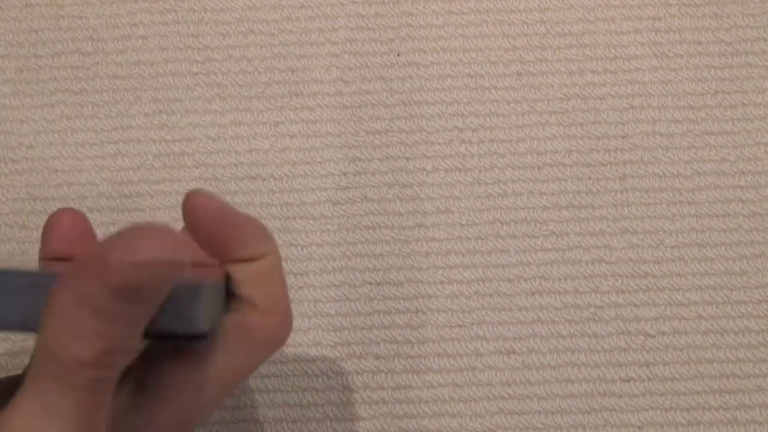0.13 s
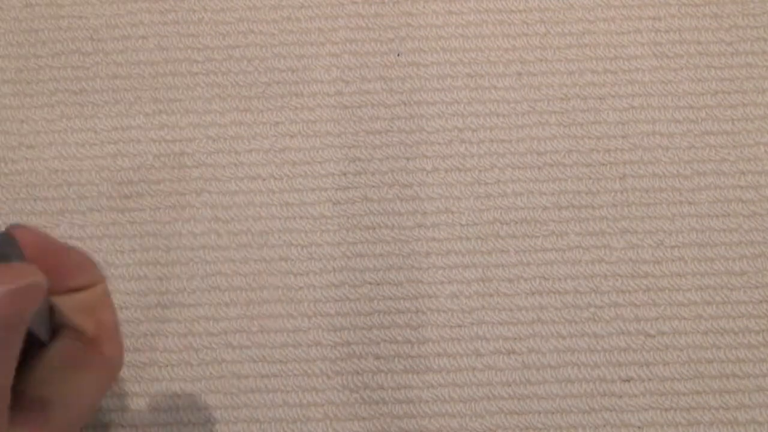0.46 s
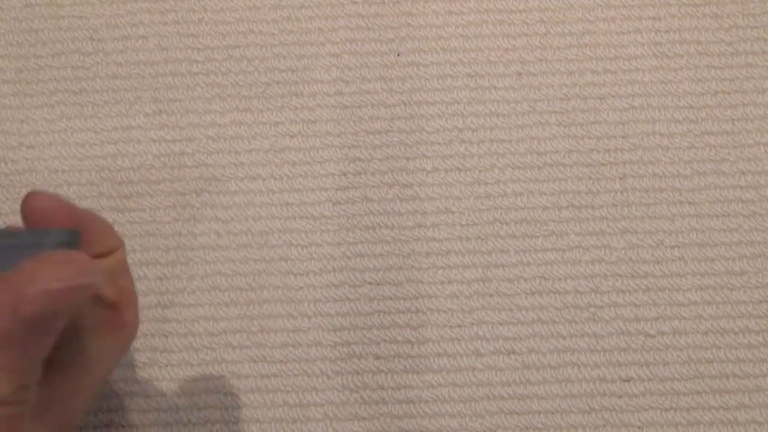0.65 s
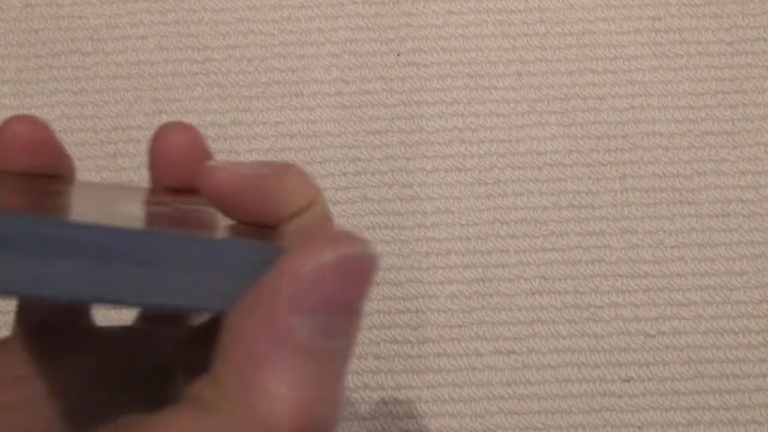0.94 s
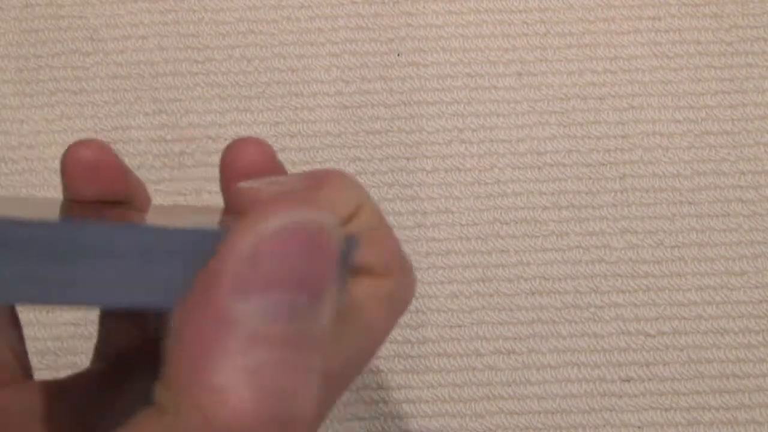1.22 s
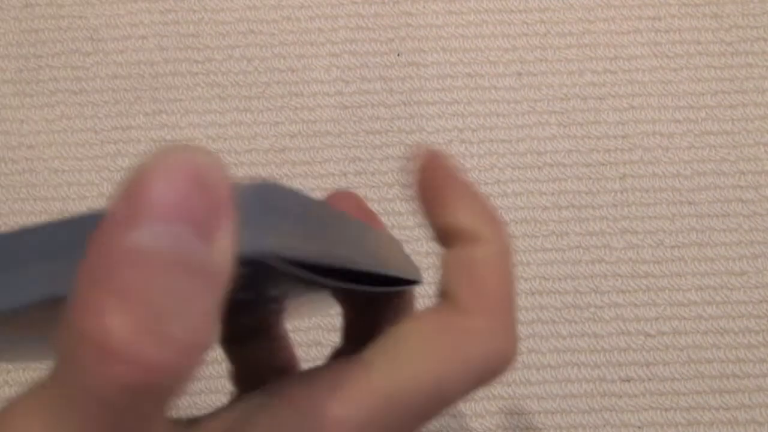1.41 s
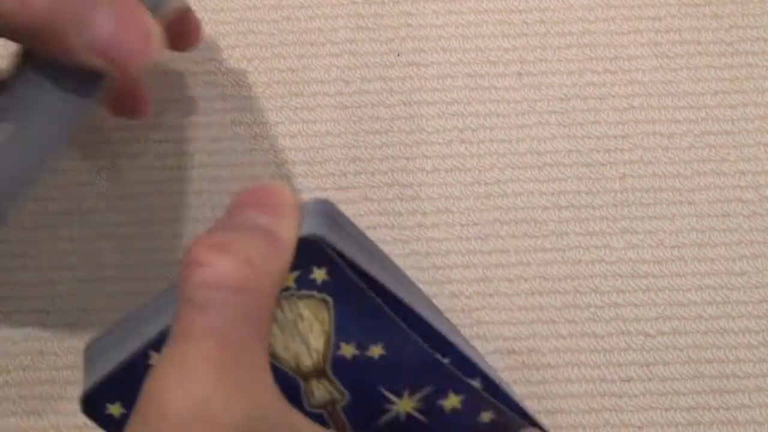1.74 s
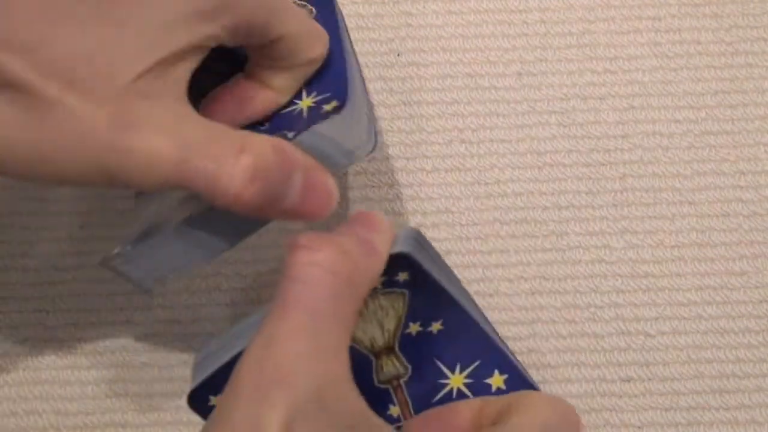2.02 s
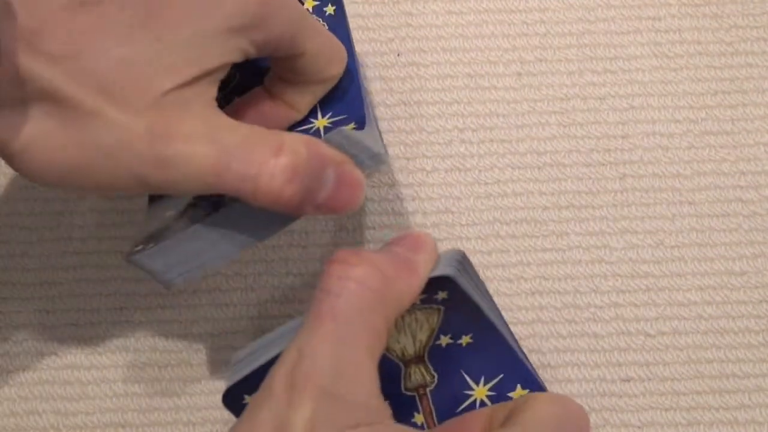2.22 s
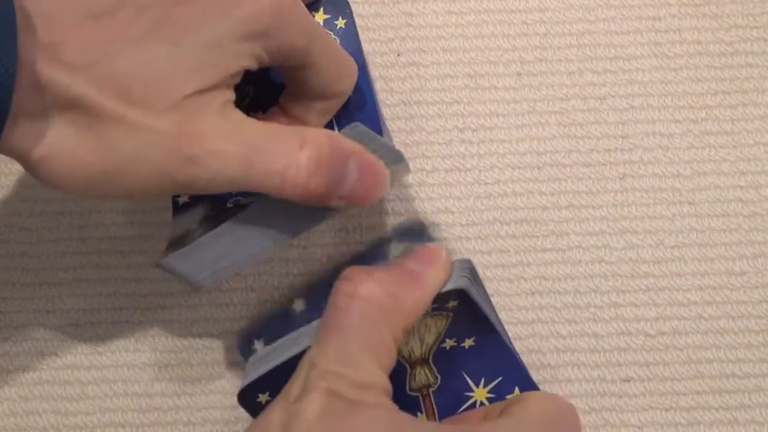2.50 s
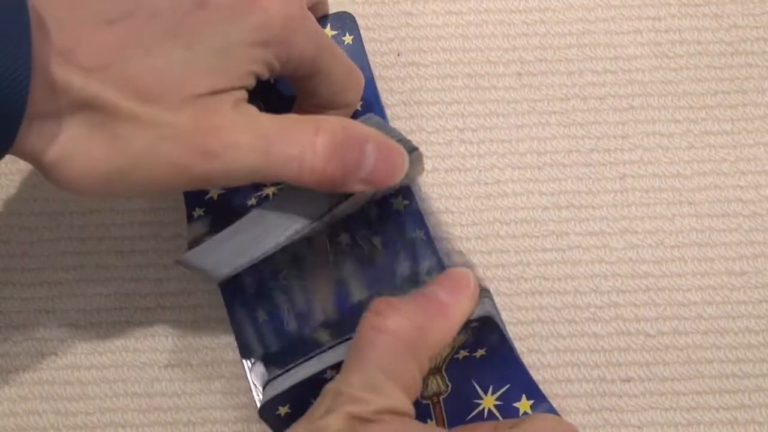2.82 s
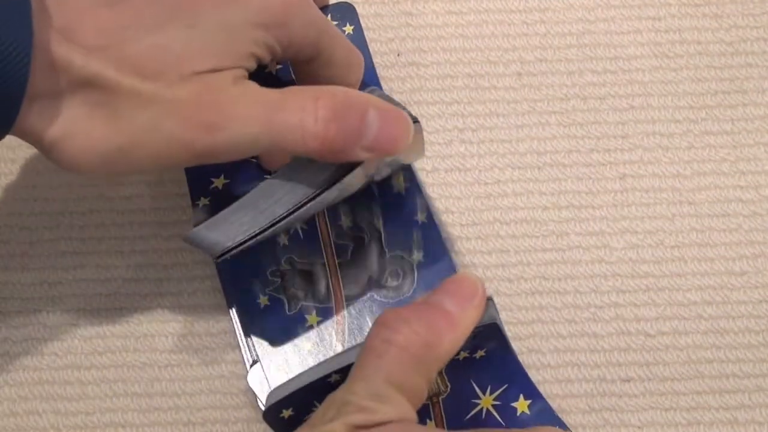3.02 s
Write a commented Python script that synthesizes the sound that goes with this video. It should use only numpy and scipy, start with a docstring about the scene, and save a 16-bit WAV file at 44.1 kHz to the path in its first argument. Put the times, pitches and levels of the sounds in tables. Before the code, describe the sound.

Playing cards are handled and shuffled close by in a quiet small room. For the first two seconds they rub softly, with light knocks near 0.9 and 1.9 seconds. From about 2.5 seconds to just past 3, a much louder riffle follows, with card edges snapping and patting onto the pile. A faint hiss lies underneath, with tiny motor ticks from about 1.5 to 2.5 seconds.

```python
"""A quiet carpeted room: a deck of playing cards is squared and cut, then riffled close to the microphone.
Cards rub over each other and packets knock in the hands. In the riffle, bent cards snap off the thumbs
with a crack and a short ring, then pat down on the pile, and the small room answers briefly.
Underneath lie the room's hush and the hiss and faint ticking of a camera's lens motor.
In the first 0.75 s a faint breath-like rush blends with the hush and the rubbing."""
import sys
import numpy as np
from scipy import signal
from scipy.fft import rfft, irfft, next_fast_len
from scipy.io import wavfile

SR = 44100
rng = np.random.default_rng(int(sys.argv[2]) if len(sys.argv) > 2 else 0)


def wav_record(signal):
    """Record a signal, one row per channel, as 16-bit PCM in the file named by sys.argv[1]."""
    frames = np.transpose(np.atleast_2d(signal))
    bounded = np.clip(frames, -1, 1)
    # unit amplitude maps onto the largest positive 16-bit level
    quanta = np.round(bounded * 32767).astype(np.int16)
    wavfile.write(sys.argv[1], SR, quanta)


N = 138915
TIME = np.arange(N) / SR
AGE = TIME[:2048]  # seconds since a blow began

# The soft thud of a card's face. Each row: frequency in Hz, relative level in dB.
THUD_SPECTRUM = [(30, -45), (70, -25.5), (130, -14), (210, -12), (320, -2), (520, -7.5), (900, -2.5),
                 (1250, -14.5), (2100, -12.5), (4000, -21), (12000, -25.5)]


def from_db(db):
    return 10 ** (np.asarray(db) / 20)


def unit(x):
    """Scale to energy 1."""
    return x / np.sqrt(np.sum(x ** 2) + 1e-20)


def colour(x, spectrum):
    """Minimum-phase filter that follows rows of frequency in Hz and gain in dB."""
    size = 2 * next_fast_len(len(x))
    hz, db = np.transpose(spectrum)
    bin_hz = np.fft.rfftfreq(size, 1 / SR)
    gain = from_db(np.interp(np.log(bin_hz + 1), np.log(hz), db))
    cepstrum = irfft(np.log(gain))
    cepstrum[1:size // 2] *= 2
    cepstrum[size // 2 + 1:] = 0
    return irfft(rfft(x, size) * np.exp(rfft(cepstrum)))[:len(x)]


def steady(noise, spectrum):
    """Colour a scene-long noise and bring it to rms 1."""
    return unit(colour(noise, spectrum)) * np.sqrt(N)


def burst(envelope, spectrum):
    """A dying run of tiny contacts, coloured by the card."""
    return colour(rng.choice([-1, 1], len(AGE)) * envelope, spectrum)


def add_blow(out, start, db, blow):
    """Mix in one blow; its level is that of its energy spread over 4 ms."""
    i = int(np.clip(start * SR, 0, N - 1))
    out[i:i + len(blow)] += (from_db(db) * np.sqrt(.004 * SR) * unit(blow))[:N - i]


def hush_and_motor_hiss():
    """Room hush, lifted at first by a faint breath-like rush; the lens motor's hiss follows its level."""
    # Spectra of the hush and the motor. Each row: frequency in Hz, relative level in dB.
    hush_spectrum = [(20, -2), (32, 7), (45, -3), (130, 2), (300, -2), (700, -9.5), (1500, -8.5),
                     (3500, -9.5), (7000, -16), (10000, -20.5), (15500, -16)]
    motor_spectrum = [(1000, -20), (3500, -49.5), (4400, 3), (4800, 7.5), (5300, 11.5), (5550, 7.5),
                      (5950, -20), (8500, -26), (9900, -37), (11000, -35), (15000, -57)]
    # The hush, with the breath-like rush up to 0.7 s. Each row: time in seconds, level in dB.
    hush_and_rush_levels = [(0, -52.5), (.7, -53), (1.05, -56.5), (1.8, -56), (2.1, -55.5), (2.45, -60),
                            (3.15, -55)]
    level = from_db(np.interp(TIME, *np.transpose(hush_and_rush_levels)))
    hush = steady(rng.standard_normal(N), hush_spectrum)
    hiss = steady(rng.standard_normal(N), motor_spectrum)
    return level * (hush + from_db(-4) * hiss)


def lens_ticks():
    """The lens motor ticks faintly and regularly for about a second."""
    # The resonances of a tick. Each row: pitch in Hz, mean level in dB, decay in seconds.
    modes = [(3060, -56, 0.0036), (3740, -68, 0.00093)]
    ticks_per_s = 25
    out = np.zeros(N)
    for start in np.arange(1.541, 2.52, 1 / ticks_per_s):
        for hz, db, decay in modes:
            ring = np.exp(-AGE / decay) * np.sin(2 * np.pi * hz * AGE)
            add_blow(out, start, db + rng.standard_normal(), ring)
    return out


def room_tail(x):
    """A small room's diffuse tail; the bass lasts a little longer."""
    bass_t60_s, treble_t60_s, delay_s, build_s = .27, .22, .0063, .0095
    age = np.maximum(TIME[:SR // 2] - delay_s, 0)
    noise = rng.standard_normal(len(age))
    bass = signal.sosfilt(signal.butter(1, 500, fs=SR, output="sos"), noise)
    tail = bass * 1000. ** (-age / bass_t60_s) + (noise - bass) * 1000. ** (-age / treble_t60_s)
    build_up = 1 - np.exp(-age / build_s)
    return signal.fftconvolve(x, unit(tail * build_up))[:N]


def rubbing_and_rush():
    """Soft card rubbing, grainy and swishing, blended with a faint breath-like rush in the first 0.75 s."""
    # Swells of rubbing; the long ones at 0.308 and 0.476 s carry the rush. Each row: middle in seconds,
    # half length in seconds, broad noise level in dB, swish level in dB, swish pitch in Hz.
    swells = [(0.052, 0.031, -50.5, -57, 3840), (0.124, 0.015, -55, -61, 3500),
              (0.308, 0.081, -55.5, -82, 4000), (0.476, 0.049, -51, -79, 4000),
              (.553, 0.014, -52, -45, 4160), (.64, 0.025, -52.5, -57, 4330), (0.715, 0.024, -55, -73, 3300),
              (0.876, 0.012, -53.5, -55, 3800), (0.914, 0.0079, -62, -45, 4670),
              (0.941, 0.015, -51.5, -43.5, 3150), (1.149, 0.032, -56, -55.5, 4130),
              (1.249, 0.012, -57, -55, 3950), (1.335, 0.045, -57.5, -58, 4260),
              (1.381, 0.011, -51.5, -62, 3850), (1.503, 0.0077, -54, -57, 2590),
              (1.878, 0.025, -55.5, -66, 3540), (1.922, .012, -46, -55, 2900),
              (1.987, .04, -58.5, -66, 2930)]
    # The broad noise of rubbing and rush. Each row: frequency in Hz, relative level in dB.
    broad_spectrum = [(100, -5), (400, 3.5), (1200, -4.5), (2500, -4.5), (4200, -8.5), (6000, -14),
                      (7500, -9.5), (10000, -6), (11200, -13), (15000, -13)]
    grains_per_s = 1600
    band_edge = np.sqrt(1.34)  # a swish spans a pitch ratio of 1.34
    grains = (rng.random(N) < grains_per_s / SR) * rng.standard_normal(N)
    grainy_noise = unit(rng.standard_normal(N)) + .45 * unit(grains)
    broad = steady(grainy_noise, broad_spectrum)
    out = np.zeros(N)
    for middle, half_length, broad_db, swish_db, hz in swells:
        band = signal.butter(2, [hz / band_edge, hz * band_edge], "band", fs=SR, output="sos")
        swish = unit(signal.sosfilt(band, rng.standard_normal(N))) * np.sqrt(N)
        swell = np.exp(-((TIME - middle) / half_length) ** 2 / 2)
        out += (from_db(broad_db) * broad + from_db(swish_db) * swish) * swell
    return out


def deck_knocks():
    """A knocked packet of cards answers with a thud, a short damped ring and a tick of its edges."""
    # Knocks in the hands. Each row: start in seconds, body level in dB, body pitch in Hz,
    # body decay in seconds, edge tick level in dB.
    knocks = [(.112, -48.5, 523, .005, -53), (.291, -51, 604, .003, -49.5), (.576, -64, 600, .003, -47),
              (.615, -67, 605, .003, -47), (.707, -55, 820, .004, -51), (.858, -51.5, 750, .003, -51),
              (0.866, -57, 710, .004, -46), (0.908, -56, 600, 0.0027, -46), (.918, -51, 600, .003, -43.5),
              (.929, -44, 550, 0.0054, -31.5), (0.936, -50, 610, 0.0027, -38), (.945, -61, 530, .004, -39),
              (1.382, -52, 975, .006, -49), (1.447, -62, 600, .003, -49.5),
              (1.508, -60, 350, 0.0044, -44.5), (1.835, -52, 300, .004, -50), (1.885, -47, 320, .004, -32),
              (1.891, -37, 457, 0.0015, -42), (1.9141, -36.5, 295, 0.0028, -39),
              (1.919, -44, 600, 0.0037, -36.5), (1.936, -57, 250, .004, -50),
              (1.950, -47, 230, 0.0031, -59), (2.562, -25, 1260, .004, -59), (2.573, -23, 843, 0.0027, -33)]
    # The tick of a packet's edges. Each row: frequency in Hz, relative level in dB.
    tick_spectrum = [(200, -20), (1200, -9), (2100, -3), (3200, 0), (5000, -3), (7200, -11), (9900, -6),
                     (11000, -14), (15000, -15)]
    out = np.zeros(N)
    for start, body_db, hz, decay, tick_db in knocks:
        fade = np.exp(-AGE / decay)
        body_spectrum = [(hz / 6, -30), (hz / 2, -9), (hz, 0),
                         (hz * 2, -6), (hz * 6, -24), (hz * 12, -38)]
        thud = burst(fade, body_spectrum)
        ring = fade * (1 - np.exp(-AGE * hz)) * np.sin(2 * np.pi * hz * AGE)
        add_blow(out, start, body_db, unit(thud) + unit(ring))
        add_blow(out, start, tick_db, burst(np.exp(-AGE / .003), tick_spectrum))
    return out


def card_pats():
    """Single cards land on the pile: a soft thud of the face with a tick of the edge."""
    # The landings. Each row: start in seconds, thud level in dB, tick level in dB.
    landings = [(2.5331, -37, -45), (2.549, -45, -40), (2.5591, -32, -49), (2.583, -30.5, -37),
                (2.6184, -30, -21.5), (2.636, -36.5, -41), (2.7014, -37.5, -40), (2.7082, -33.5, -31.5),
                (2.7198, -31.5, -32), (2.7406, -30.5, -39), (2.7587, -28.5, -54), (2.778, -34.5, -56),
                (2.7909, -34, -59), (2.813, -36, -43), (2.8278, -35, -48), (2.8491, -34, -50),
                (2.8555, -33, -30), (2.8743, -35, -33), (2.879, -37, -34), (2.914, -31.5, -31),
                (2.932, -35, -44), (2.949, -38, -42), (2.9723, -35, -30), (2.996, -34, -24),
                (3.042, -38, -38), (3.047, -31.5, -24), (3.0675, -25.5, -31), (3.071, -33, -26),
                (3.0946, -41, -27), (3.1014, -31.5, -27), (3.104, -34.5, -39), (3.1244, -35, -31),
                (3.141, -35, -37)]
    # The tick of one card's edge. Each row: frequency in Hz, relative level in dB.
    tick_spectrum = [(200, -20.5), (1200, -20), (2200, 4), (3300, -7.5), (5000, 3), (7200, -19.5),
                     (9900, 0), (11000, -14.5), (15000, 2)]
    out = np.zeros(N)
    for start, thud_db, tick_db in landings:
        add_blow(out, start, thud_db, burst(np.exp(-AGE / .005), THUD_SPECTRUM))
        add_blow(out, start, tick_db, burst(np.exp(-AGE / .003), tick_spectrum))
    return out


def card_flex(hz):
    """A freed card rings for a few cycles; fast bending waves come first, so the pitch drops."""
    rise_s, decay_s, glide_s = .0029, .002, .000948
    falling_hz = hz * (1 + 1.257 * np.exp(-AGE / glide_s))
    phase = 2 * np.pi * np.cumsum(falling_hz) / SR
    envelope = (1 - np.exp(-AGE / rise_s)) ** 2 * np.exp(-AGE / decay_s)
    rattle = burst(envelope, [(hz / 4, -20), (hz / 1.46, -5), (hz, 0), (hz * 1.33, -5), (hz * 3, -24)])
    return unit(envelope * np.sin(phase)) + .91 * unit(rattle)


def riffle_snaps():
    """Bent cards snap off the thumbs at close range: edge crack, flex ring, slap and the room's answer."""
    # The snaps. Each row: start in seconds, crack level in dB, ring level in dB, ring pitch in Hz,
    # slap level in dB, room level in dB.
    snaps = [(2.573, -23, -31, 3820, -47, -44), (2.5916, -18, -42, 2700, -37, -22),
             (2.5949, -15.5, -24, 2100, -28.5, -20.5), (2.6076, -17.5, -17, 2390, -31, -18),
             (2.6118, -24, -22, 2556, -30.5, -29), (2.7268, -26.5, -38, 2830, -30.5, -35),
             (2.8593, -11, -14, 2133, -24.5, -18.5), (2.8959, -16, -18.5, 2240, -30.5, -22),
             (2.978, -15, -16.5, 3800, -34.5, -19.5), (2.9857, -18, -17, 2640, -40, -22),
             (3.0510, -17.5, -15, 2143, -25, -28.5), (3.0554, -18.5, -27, 2320, -34, -29),
             (3.1107, -16, -24, 2360, -30.5, -23), (3.1451, -16.5, -22, 2500, -28, -35)]
    # Spectra of the crack and its tail in the room. Each row: frequency in Hz, relative level in dB.
    crack_spectrum = [(200, -17), (1200, -3.5), (2500, 3), (4000, 8), (5500, 6), (7200, -2), (9800, 3),
                      (10900, -5), (12500, -5.5), (15500, 0.5)]
    room_spectrum = [(50, -40), (150, -5), (210, -12.5), (350, -4.5), (600, -3.5), (900, 2.5), (1250, -3.5),
                     (1900, 0.5), (2400, 4.5), (3400, 2.5), (4100, 3.5), (5200, -2), (7000, -9.5),
                     (10000, -5), (10900, -20), (12500, -9), (15500, -13)]
    crack_s, chatter_s, slap_s = .0008, .004, .0035  # decay times
    impulse = signal.unit_impulse(len(AGE))
    click = unit(colour(impulse, crack_spectrum))
    edge_fade = np.exp(-AGE / crack_s) + from_db(-12) * np.exp(-AGE / chatter_s)
    direct, to_room = np.zeros((2, N))
    for start, crack_db, ring_db, hz, slap_db, room_db in snaps:
        chatter = unit(burst(edge_fade, crack_spectrum))
        add_blow(direct, start, crack_db, .45 * click + chatter)
        add_blow(direct, start, ring_db, card_flex(hz))
        add_blow(direct, start, slap_db, burst(np.exp(-AGE / slap_s), THUD_SPECTRUM))
        add_blow(to_room, start, room_db, impulse)
    tail = unit(colour(room_tail(to_room), room_spectrum))
    return direct + tail * np.sqrt(np.sum(to_room ** 2))  # the tail carries the energy sent to the room


def scene():
    """The cards up close over the quiet room, all heard in the centre."""
    snaps = riffle_snaps()
    taps = card_pats() + deck_knocks()
    foreground = snaps + taps + from_db(-11.5) * room_tail(taps) + rubbing_and_rush()
    mono = foreground + hush_and_motor_hiss() + lens_ticks()
    return np.array([mono, mono])


def record(dry):
    """The loudest peaks are rounded; the deep bass and the top are cut."""
    ceiling, low_cut_hz, high_cut_hz = .8, 42, 15650
    rounded = ceiling * np.tanh(dry / ceiling)
    lean = signal.sosfilt(signal.butter(2, low_cut_hz, "high", fs=SR, output="sos"), rounded)
    return signal.sosfilt(signal.ellip(10, .1, 80, high_cut_hz, fs=SR, output="sos"), lean)


dry = scene()
out = record(dry)
wav_record(out)
```